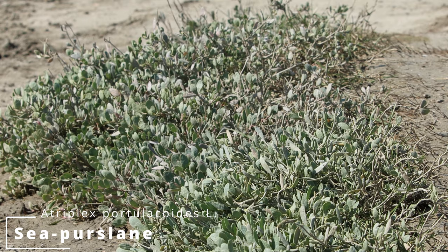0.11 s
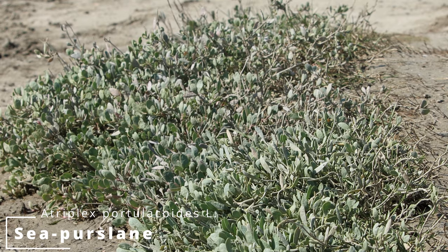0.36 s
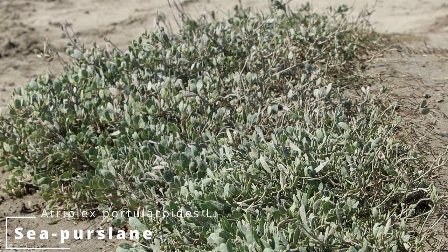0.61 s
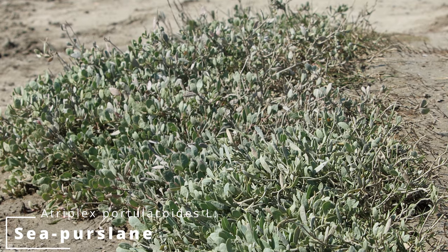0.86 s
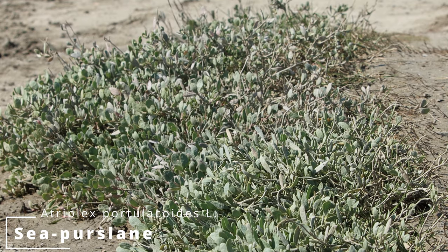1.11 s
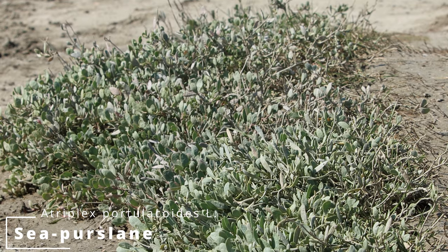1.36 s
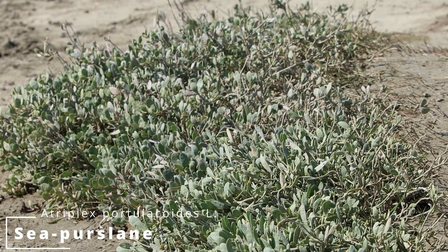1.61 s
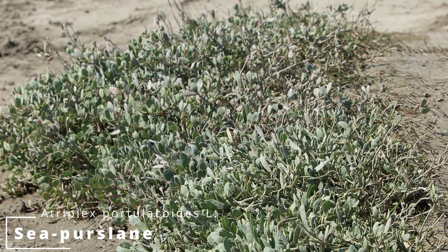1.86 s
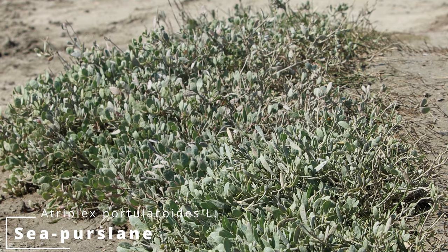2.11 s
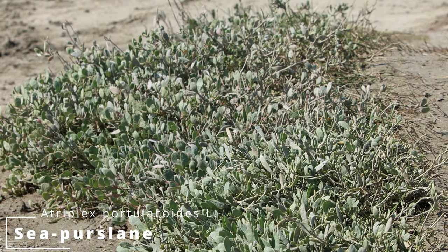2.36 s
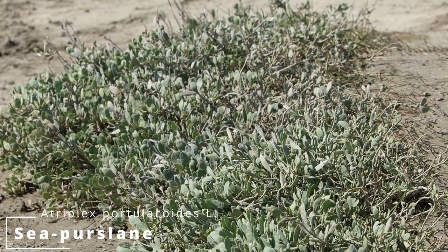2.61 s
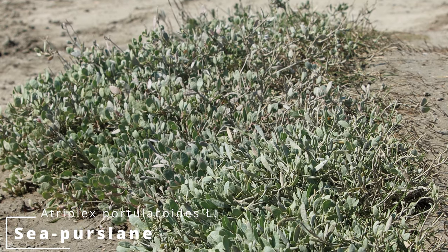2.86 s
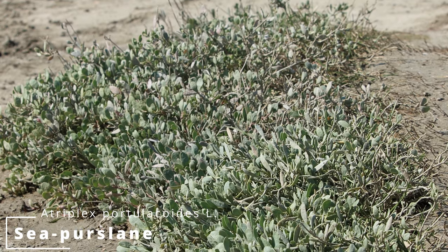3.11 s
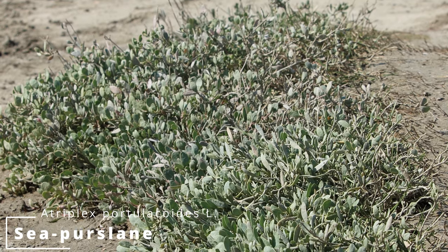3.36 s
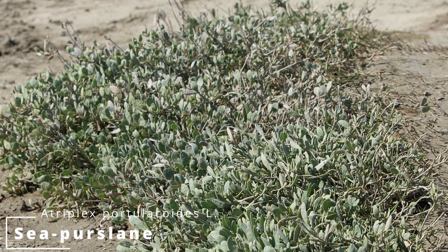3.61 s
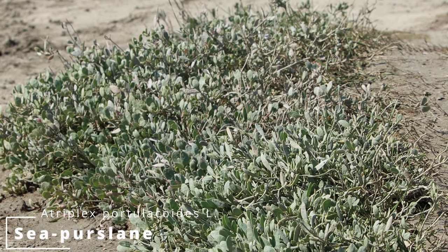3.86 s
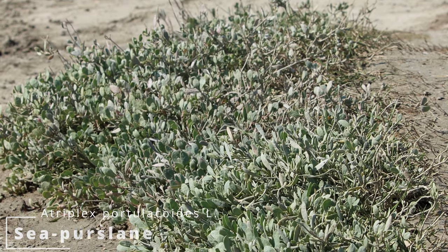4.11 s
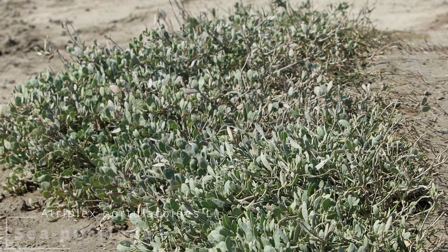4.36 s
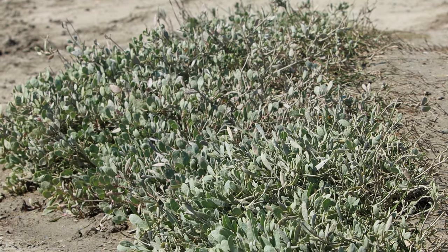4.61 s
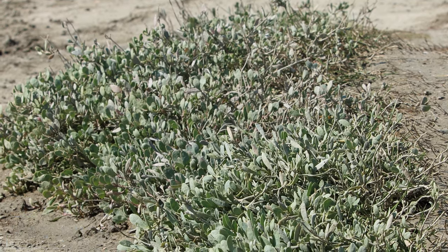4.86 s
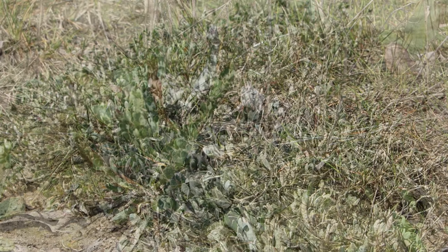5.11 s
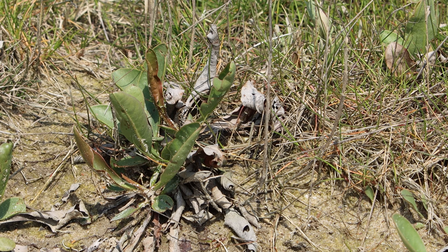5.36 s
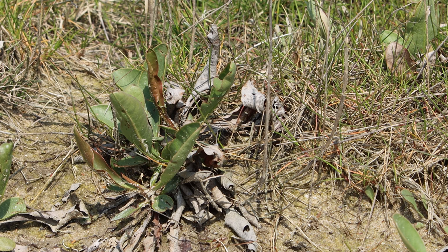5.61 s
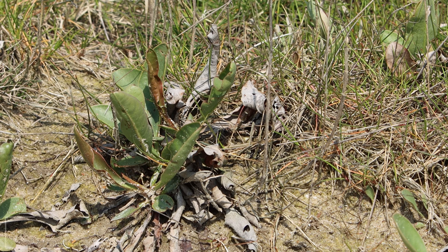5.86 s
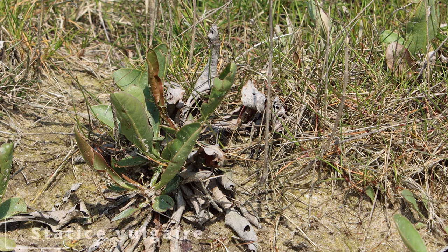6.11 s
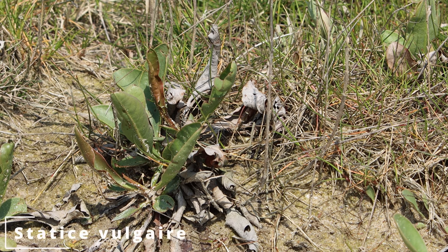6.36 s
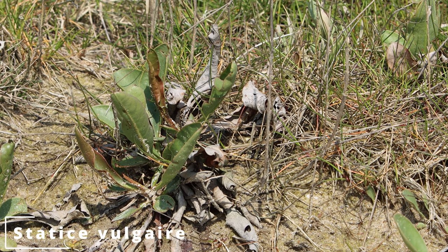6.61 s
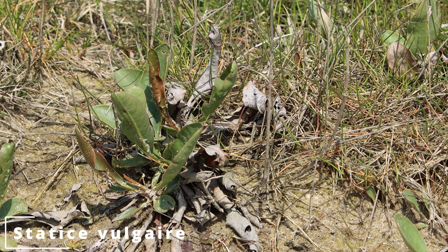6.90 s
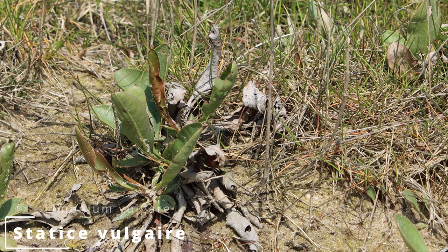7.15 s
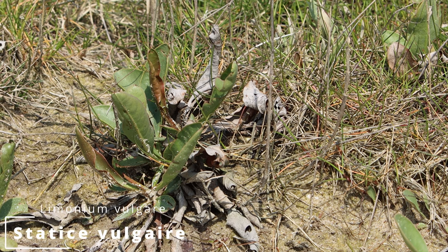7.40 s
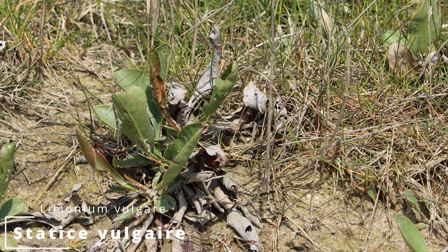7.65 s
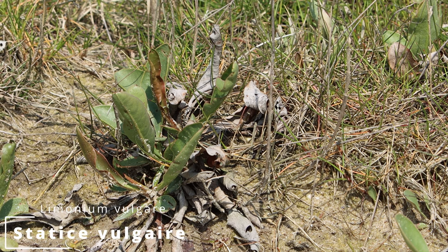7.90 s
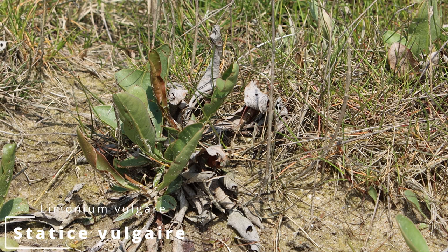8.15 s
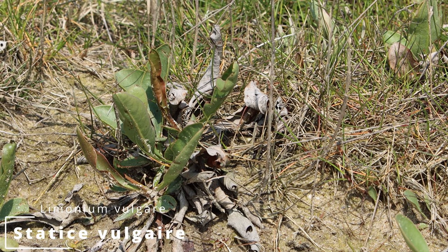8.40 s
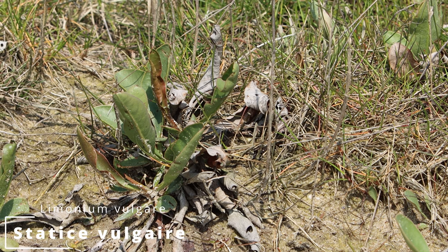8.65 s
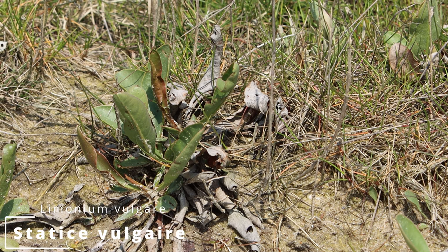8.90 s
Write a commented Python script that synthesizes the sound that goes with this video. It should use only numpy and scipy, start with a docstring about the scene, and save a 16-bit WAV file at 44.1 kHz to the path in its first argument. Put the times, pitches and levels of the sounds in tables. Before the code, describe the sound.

Outdoor stereo ambience with lumpy low wind on the microphone and a smooth faint hiss. A near gull to the right cries seven times, each a nasal, rapidly fluttering call that jumps up then sags, the last much weaker. Distant gulls overlap between cries, thinner and softer. A few sliding wader whistles and tiny high chips appear mainly after five seconds; small dry ticks dot the first half. Slight diffuse echoes, open ground.

```python
"""A windy salt marsh with a gull colony. One gull close on the right repeats a harsh fluttering cry, a sum
of overtones whose pitch and level pulse with the voice membranes and are coloured by throat and bill.
Others answer from farther off with fewer overtones, over a crowd of overlapping cries. Small waders whistle
and chip as gliding near sines; noise bursts make dry ticks and, overlapping, one short broad squawk.
Wind rumbles on the microphone as shaped noise in lumps, over a soft hiss."""
import sys
import numpy as np
from scipy import signal
from scipy.fft import rfft, irfft
from scipy.io import wavfile
from scipy.ndimage import uniform_filter1d

SR = 44100
rng = np.random.default_rng(int(sys.argv[2]) if len(sys.argv) > 2 else 0)


def to_linear_factor(level_db):
    """Convert decibel levels (scalar or array-like) to linear amplitude factors."""
    exponent = np.asarray(level_db, float) / 20
    return 10 ** exponent


def wav_record(signal):
    """Record a signal, one row per channel, as 16-bit PCM in the file named by sys.argv[1]."""
    frames = np.transpose(np.atleast_2d(signal))
    bounded = np.clip(frames, -1, 1)
    # unit amplitude maps onto the largest positive 16-bit level
    quanta = np.round(bounded * 32767).astype(np.int16)
    wavfile.write(sys.argv[1], SR, quanta)


N = 397341

# overtones of a far voice: multiple (of the strongest overtone's pitch), level_db
FAR_OVERTONES = [(.5, -13.5), (1, 3.5), (1.5, -21), (2, -21)]


def in_time(rows, t):
    """Linear interpolation: the columns of a table read at the times t."""
    s, *columns = np.transpose(rows)
    return [np.interp(t, s, column) for column in columns]


def at_hz(points, hz):
    """Spectral envelope: levels interpolated on a log-frequency axis."""
    points_hz, points_db = np.transpose(points)
    return np.interp(np.log(hz), np.log(points_hz), points_db)


def bump(hz, centre_hz, width):
    """Resonance: a bell shape 0-1 on a log-frequency axis."""
    return np.exp(-.5 * (np.log(hz / centre_hz) / width) ** 2)


def drift(rate_hz, size):
    """Random modulation: white noise through a two-pole low-pass, scaled to spread 1."""
    r = np.exp(-2 * np.pi * rate_hz / SR)
    settle = 9000
    slow = signal.lfilter([1], [1, -2 * r, r * r], rng.standard_normal(size + settle))[settle:]
    return slow / slow.std()


def coloured(spectrum, shape):
    """Spectral shaping: white noise bent to a spectrum, rms 1."""
    hz = np.maximum(np.arange(N // 2 + 1) * SR / N, 1)
    noise = irfft(rfft(rng.standard_normal(shape)) * to_linear_factor(at_hz(spectrum, hz)), N)
    return noise / noise.std()


def span(rows):
    """Amplitude window: first sample, times and soft-edged window of a call."""
    first = int(rows[0][0] * SR)
    t = np.arange(first, min(int(rows[-1][0] * SR), N)) / SR
    return first, t, np.clip(np.minimum(t - t[0], t[-1] - t) / 0.0062, 0, 1)


def flutter(per_s, unsteady):
    """Phase accumulation: position 0-1 within each flutter of the voice membranes."""
    rate = per_s * (1 + unsteady * drift(25, size=len(per_s)))
    return (rng.random() + np.cumsum(rate) / SR) % 1


def hiss():
    """Partial coherence: smooth noise of far water and microphone, less alike left and right in the treble."""
    # noise spectrum: frequency_hz, density_db (relative, per Hz)
    hiss_spectrum = [(210, -14.5), (350, 0), (466, -6), (740, -1), (1000, -6), (1800, -6), (2820, -14),
                     (7330, -18.5), (15000, -19.5), (15700, -16)]
    # left-right coherence: frequency_hz, likeness (0-1)
    side_likeness = [(400, 0.8), (1400, 0.92), (2400, 0.78), (4000, 0.66), (5500, 0.12), (9000, 0.096)]
    mid, side = rfft(coloured(hiss_spectrum, (2, N)))
    hz = np.maximum(np.arange(len(mid)) * SR / N, 1)
    alike = np.clip(at_hz(side_likeness, hz), 0, 1)
    pair = np.sqrt(1 + alike) * mid + np.sqrt(1 - alike) * side * [[1], [-1]]
    return to_linear_factor(-68.5) * irfft(pair, N)      # the pair is 3 dB above rms 1 before this gain


def wind():
    """Turbulent pressure on the microphone: lumpy low noise that reaches both channels alike."""
    # rumble: time_s, level_db (before thuds and drift)
    rumble = [(0, -47.5), (1, -46), (2, -48), (2.8, -44.5), (3, -39), (3.28, -43.5), (3.36, -49.5),
              (4.2, -51), (4.8, -48.5), (5.2, -42), (6.3, -43), (6.9, -43.5), (7.27, -53.5), (7.55, -47.5),
              (8.1, -56.5), (8.6, -54), (9.01, -45)]
    # finer buffeting, calming as the microphone moves into shelter: time_s, level_db (before thuds and drift)
    buffeting = [(0, -54.5), (2.3, -53), (3.1, -54), (3.5, -55.5), (4.5, -54.5), (4.9, -51.5), (5.6, -59),
                 (6.3, -57), (6.95, -60), (7.25, -63.5), (8.5, -66), (9.01, -59.5)]
    # rumble spectrum: frequency_hz, density_db (relative, per Hz)
    gust_spectrum = [(8.8, -42.5), (15, 4.5), (39, 5.5), (100, -15.5), (130, -25.5), (220, -120)]
    # buffeting spectrum: frequency_hz, density_db (relative, per Hz)
    buffet_spectrum = [(35, -43), (60, -6), (86, -4.5), (188, -11.5), (464, -31.5), (700, -31), (910, -89),
                       (1540, -120)]
    # single thuds of air: time_s, swell_db (of the rumble)
    air_thuds = [(.17, 6.1), (.93, 3.4), (1.78, 6.1), (2.91, 11), (4.92, 7.2), (5.17, 2), (6.35, 3),
                 (7.58, 5), (8.46, 8.7)]
    thud_spread_s = 0.02
    t = np.arange(N) / SR
    thuds_db = sum(db * np.exp(-.5 * ((t - s) / thud_spread_s) ** 2) for s, db in air_thuds)
    gust_db = in_time(rumble, t)[0] + thuds_db + 1.5 * drift(4.9, size=N)
    buffet_db = in_time(buffeting, t)[0] + 0.19 * thuds_db + 1.87 * drift(6.5, size=N)
    return to_linear_factor(gust_db) * coloured(gust_spectrum, N) + to_linear_factor(buffet_db) * coloured(buffet_spectrum, N)


def ticks_and_squawk():
    """Damped noise: each burst is band-passed around a centre and dies exponentially."""
    # dry ticks nearby, and a short broad squawk at 1.45-1.5 s made of three overlapping noise bursts:
    # start_s, peak_db, centre_hz, t60_s (60 dB decay, before the band-pass)
    burst_rows = [(.048, -60, 4800, 0.0078), (.684, -54, 2400, 0.011), (1.267, -61, 3700, 0.0086),
                  (1.31, -49, 5500, 0.006), (1.41, -63, 4660, .01), (1.443, -60, 8300, .006),
                  (1.453, -55, 3600, 0.059), (1.468, -56, 3600, .055), (1.484, -55, 3480, .05),
                  (1.884, -60, 6200, .006), (2.054, -60, 4400, .01), (2.527, -55, 2400, .02),
                  (3.198, -54, 2970, 0.019), (3.229, -61, 5200, .0068), (4.176, -58.5, 4000, 0.013),
                  (6.833, -62, 3356, .008)]
    out, t = np.zeros(N), np.arange(1500) / SR
    for s, peak_db, hz, t60 in burst_rows:
        burst = rng.standard_normal(len(t)) * to_linear_factor(-60 * t / max(t60, .002))
        # louder bursts are wider: 0.6 octaves at -57.5 dB
        octaves = np.clip(.6 * to_linear_factor(.85 * (peak_db + 57.5)), .1, 2.4)
        half = 2 ** (octaves / 2)
        band = signal.butter(2, [hz / half, hz * half], "band", fs=SR, output="sos")
        burst = signal.sosfilt(band, burst)
        first = int(s * SR)
        out[first:first + len(t)] += to_linear_factor(peak_db) * burst / abs(burst).max()
    return out


def far_cry(hz, overtones, depth, rough, swing):
    """Amplitude and frequency modulation: a gull voice thinned by distance to few throbbing overtones."""
    cycle = flutter(np.full(len(hz), rng.uniform(62.27, 88.6)), unsteady=0.031)
    hz = hz * (1 - swing * np.cos(np.pi * cycle) + rough * drift(261, size=len(hz)))
    phase = 2 * np.pi * np.cumsum(hz) / SR
    tone = sum(to_linear_factor(db) * np.sin(k * phase) for k, db in overtones)
    throb = 1 - depth * np.cos(np.pi * cycle) ** 2
    return 1.42 * tone * throb * to_linear_factor(1.26 * drift(30, size=len(hz)))     # rms near 1


def colony(count=280):
    """Superposition: many short arched cries at chance moments, pitches, lengths and distances."""
    # the crowd of gulls too far to tell apart: time_s, level_db
    crowd_level = [(0, -87), (.35, -68), (1.3, -76), (1.9, -64.5), (2.15, -80), (2.45, -67), (3.3, -62.5),
                   (3.6, -72.5), (4.65, -65), (5.5, -70.5), (5.75, -80.5), (6.45, -68.5), (6.9, -96),
                   (7.5, -73.5), (8.1, -91), (8.45, -88), (8.7, -62.5), (9.01, -84)]
    out = np.zeros(N + SR)
    for when, pitch, length, distance in rng.random((count, 4)):
        along = np.linspace(0, 1, int((0.0584 + .22 * length) * SR))
        hz = (1500 + 700 * pitch) * (.84 + .16 * np.sin(np.pi * along ** .6))
        first = int(when * (N + SR // 2))
        cry = far_cry(hz, FAR_OVERTONES, depth=.9, rough=.06, swing=.035)
        out[first:first + len(along)] += to_linear_factor(-8 * distance) * abs(np.sin(np.pi * along)) * cry
    out = out[SR // 2:SR // 2 + N]
    # even out the crowd before its own level curve
    out = out / np.sqrt(uniform_filter1d(out ** 2, size=15000) + 0.061)
    return to_linear_factor(in_time(crowd_level, np.arange(N) / SR)[0]) * out


def answer(s, rise, length, hz, db):
    """Pitch contour: corners (s, Hz, dB) of a far cry that climbs, sags and breaks off downward."""
    rise_per_s, sag_per_s = 1.8, .65        # shares of the top pitch per s
    drop, drop_s = 0.167, 0.0453            # the break: share of the top pitch, s
    start_db, end_db = -3.5, -5
    held = max(length - rise - drop_s, .001)
    sagged = hz * (1 - sag_per_s * held)
    dropped = sagged - hz * drop * (length - rise - held) / drop_s
    return [(s, hz * (1 - rise_per_s * rise), db + start_db), (s + rise, hz, db),
            (s + rise + held, sagged, db), (s + length, dropped, db + end_db)]


def far_gulls():
    """Modulated overtones: single answering cries, arched ones and hoarse nearly level ones."""
    # arched cries: start_s, rise_s (to the top), length_s, top_pitch_hz (strongest overtone), level_db
    arched_cries = [(.04, .012, 0.24, 1860, -71), (0.159, 0.022, .03, 1370, -65),
                    (0.296, 0.0092, 0.16, 1443, -78), (.33, 0.036, .05, 2110, -68),
                    (.4, 0.048, 0.13, 2100, -66), (0.529, 0.011, .13, 1930, -72),
                    (1.6, 0.082, 0.1, 2200, -63), (1.679, 0.062, .1, 2110, -70.5),
                    (1.929, 0.02, 0.054, 2250, -64.5), (2.485, .025, 0.026, 1397, -65),
                    (2.947, .012, .1, 1856, -69.5), (3.086, 0.021, 0.047, 2170, -64.5),
                    (3.325, 0.021, 0.094, 1956, -68), (3.392, 0.019, 0.037, 1290, -63.5),
                    (4.646, 0.033, 0.066, 2050, -66), (5.24, 0.011, 0.2, 2117, -60.5),
                    (5.409, 0.009, 0.054, 2250, -66), (6.112, 0.068, 0.24, 2186, -64.5),
                    (6.37, 0.016, 0.066, 2150, -71), (6.57, 0.017, 0.067, 2110, -69.5),
                    (7.024, .065, .27, 2100, -61.5), (7.361, .012, 0.075, 1460, -70),
                    (7.419, 0.068, 0.34, 2010, -71), (7.698, 0.082, 0.25, 2118, -61.5),
                    (7.94, .012, .06, 2130, -73), (8.078, .03, .2, 1520, -83),
                    (8.281, 0.045, 0.11, 2220, -73.5), (8.46, .012, 0.09, 2102, -71.5),
                    (8.541, 0.1, 0.15, 1716, -66.5), (8.699, 0.061, 0.12, 2200, -70),
                    (8.881, .04, 0.15, 1803, -71)]
    # bands of hoarse cries, one row a band, some cries have two: start_s, length_s, band_centre_hz, level_db
    hoarse_bands = [(0.238, 0.11, 2030, -64), (1.2, 0.29, 1860, -64), (1.79, 0.11, 1780, -66),
                    (1.888, .14, 1363, -63.5), (3.16, 0.19, 1700, -76), (4.173, 0.27, 1720, -73),
                    (4.251, 0.23, 4040, -77.5), (5.198, 0.13, 4350, -69), (6.754, 0.22, 4320, -79),
                    (7.699, 0.069, 1835, -59), (7.702, 0.056, 3880, -71), (7.879, 0.058, 1902, -60),
                    (7.88, 0.041, 3910, -75), (8.277, .1, 3970, -79), (8.68, 0.126, 1500, -67)]
    hoarse_sag, hoarse_end_db = .04, -2     # share of the pitch lost by the end, dB
    out = np.zeros(N)
    arched = [answer(*row) for row in arched_cries]
    hoarse = [[(s, hz, db), (s + length, hz * (1 - hoarse_sag), db + hoarse_end_db)]
              for s, length, hz, db in hoarse_bands]
    kinds = ((arched, FAR_OVERTONES, .018, .025), (hoarse, [(1, 0)], .045, .035))
    for contours, overtones, rough, swing in kinds:
        for rows in contours:
            first, t, edge = span(rows)
            hz, level_db = in_time(rows, t)
            voice = far_cry(hz, overtones, depth=0.61, rough=rough, swing=swing)
            out[first:first + len(t)] += to_linear_factor(level_db) * edge * voice
    return out


def whistle(s, rise, length, hz, db):
    """Pitch contour: corners (s, Hz, dB) of a whistle that shoots up and bends over ever faster."""
    arch_per_s, start_db, end_db = 1.05, -6, -2
    arch = arch_per_s * length              # longer whistles arch deeper (share of the top pitch)
    after = np.linspace(0, length - rise, 8)
    share = after / after[-1]
    swell_db = end_db * (2 * share - 1) ** 2
    climb = [(s, hz * (1 - arch), db + start_db), (s + rise / 2, hz * (1 - arch / 4), db + end_db)]
    return climb + list(zip(s + rise + after, hz * (1 - arch * share ** 2.4), db + swell_db))


def chip(s, hz, db):
    """Linear glide: corners (s, Hz, dB) of a chip that slides straight down at a steady level."""
    length_s, fall_hz = 0.035, 850
    return [(s, hz, db), (s + length_s, hz - fall_hz, db)]


def shore_birds():
    """Frequency modulation: near sines with a slight waver follow the notes of small waders."""
    # clear arched whistles: start_s, rise_s (to the top), length_s, top_pitch_hz, level_db
    whistle_rows = [(1.635, .02, 0.045, 2520, -61), (5.302, .045, 0.2, 3050, -54.5),
                    (6.061, 0.05, 0.089, 2620, -57.5), (8.597, .045, .06, 2560, -72),
                    (8.783, .012, 0.048, 2530, -65)]
    # falling chips: start_s, first_pitch_hz, level_db
    chip_rows = [(5.38, 5860, -65.5), (5.49, 5500, -74), (6.33, 5780, -64), (7.425, 5600, -74),
                 (8.485, 5500, -65.5)]
    out = np.zeros(N)
    for rows in [whistle(*row) for row in whistle_rows] + [chip(*row) for row in chip_rows]:
        first, t, edge = span(rows)
        hz, level_db = in_time(rows, t)
        hz = uniform_filter1d(hz, size=300) * (1 + 0.0051 * drift(45, size=len(t)))
        out[first:first + len(t)] += to_linear_factor(level_db) * edge * np.sin(2 * np.pi * np.cumsum(hz) / SR)
    return out


def near_gull():
    """Source and filter: each flutter slides the pitch up and opens and shuts the voice; throat and bill
    resonances colour the overtones."""
    # one row a cry: start_s, length_s, level_db, brightness_db_per_octave (before gape), lowest_overtone_db
    near_cries = [(0.779, .4, -49, -4.5, 2), (2.548, .42, -51, -5, -5), (3.634, 0.53, -47.5, -3, -5),
                  (4.735, 0.54, -51.5, -3, -0.5), (5.833, .46, -48.5, -5, -7.5),
                  (7.046, 0.41, -54, -5, -0.5), (8.871, 0.42, -66, 0, -4)]
    # throat response: frequency_hz, level_db
    throat = [(500, -41), (800, -7), (1150, -3.5), (1450, -3.5), (1750, 1.5), (1950, 6.5), (2300, -4.5),
              (2600, -10), (3000, -2.5), (3550, -19), (4300, -6), (6200, -15.5), (7300, -9.5), (8000, -16),
              (10000, -38)]
    # pitch arch: share_of_length, share_of_top_pitch (before fall_power)
    pitch_arch = [(0, .64), (.05, .8), (.14, 1.0), (.4, .975), (.65, 0.75), (.85, .74), (1, 0.48)]
    # lower bill resonance as the bill closes: share_of_length, frequency_hz, level_db (before gape)
    lower_bill = [(0, 4300, 10.5), (.2, 4250, 8.5), (.5, 4450, 11), (.8, 4556, 14), (1, 4400, 10)]
    # upper resonance, following how wide it gapes: time_s, frequency_hz
    upper_gape = [(.77, 6042), (.86, 6370), (.95, 5800), (1.15, 5800), (2.56, 5610), (2.73, 5500),
                  (2.96, 5670), (3.65, 5740), (3.84, 5470), (4.15, 5520), (4.8, 5500), (5.0, 5270),
                  (5.27, 5600), (5.85, 5640), (5.91, 6070), (5.99, 5100), (6.29, 5540), (7.05, 5380)]
    attack_s, attack_db, sag_db, release_s, release_db = 0.036, -7.5, -3.0, .08, -14.5
    swing, depth, breath = .065, .95, .28           # pitch slide, level flutter, random level per overtone
    rough_start, rough_end = .018, .036             # pitch unsteadiness grows through the cry
    fall_power = 1.22                               # steepness of the pitch fall after the top
    gape_brightens, gape_shifts_db = 1.6, 8         # per kHz of gape: dB per octave, dB from lower to upper
    upper_db, half_db, closing_db, tail_db = 6.0, 2.0, -10.0, 8.0
    flutter_end = 66                                # flutters per s
    out = np.zeros(N)
    for s, length, db, bright_db, low_db in near_cries:
        # the level swells in, sags, then dies away
        end = s + length
        rows = [(s, db + attack_db), (s + attack_s, db), (end - release_s, db + sag_db),
                (end, db + sag_db + release_db)]
        first, t, edge = span(rows)
        level_db, = in_time(rows, t)
        along = (t - t[0]) / length
        lower_hz, lower_db = in_time(lower_bill, along)
        upper_hz, = in_time(upper_gape, t)
        gape = (upper_hz - 5600) / 1000             # kHz
        # louder cries reach higher and start fluttering faster; all slow down
        top_hz = max(1176.4 + 11.0 * (db + 50), 1133)
        flutter_start = max(89 + 1.8 * (db + 50), flutter_end + 6)
        cycle = flutter(flutter_start + (flutter_end - flutter_start) * along, unsteady=.035)
        rough = rough_start + (rough_end - rough_start) * np.sqrt(along)
        grown = np.clip((t - t[0]) / 0.0414, 0, 1) ** 2     # the cry opens on a clear note
        hz = top_hz * in_time(pitch_arch, along)[0] ** np.where(along > .14, fall_power, 1)
        slide = swing * grown * (.5 + along) * np.cos(np.pi * cycle)
        hz = hz * (1 - slide + rough * drift(310.0, size=len(t)))
        phase = 2 * np.pi * np.cumsum(hz) / SR
        lowest_db = low_db * grown + tail_db * along ** 6   # the lowest whole overtone outlasts the rest
        slope_db = bright_db + gape_brightens * gape
        tone = 0
        for k in np.arange(1, 23) / 2:              # strong-weak pulses add lines halfway between
            line_hz = k * hz
            bill_db = (lower_db - gape_shifts_db * gape) * bump(line_hz, lower_hz, .06)
            bill_db = bill_db + (upper_db + gape_shifts_db * gape) * bump(line_hz, upper_hz, .065)
            # this band fades as the bill closes
            bill_db = bill_db + closing_db * along * bump(line_hz, 3150, 0.084)
            gain = to_linear_factor(at_hz(throat, line_hz) + slope_db * np.log2(line_hz / 2000) + bill_db)
            if k % 1:
                gain = gain * grown * to_linear_factor(half_db)
            elif k == 1:
                gain = gain * to_linear_factor(lowest_db)
            tone = tone + gain * np.sin(k * phase) * (1 + breath * drift(330, size=len(t)))
        tone = tone * (1 - depth * grown * np.cos(np.pi * cycle) ** 2)
        loudness = np.sqrt(uniform_filter1d(tone ** 2, size=1200))
        out[first:first + len(t)] += to_linear_factor(level_db) * edge * tone / loudness
    return out


def from_the_right(x):
    """Interaural cues: the left side hears it later and duller; the pair is then narrowed."""
    lag_s, shadow_db, shadow_hz, pair_width = 0.000325, -5, 4000, .32     # lag and shadow before narrowing
    late = np.interp(np.arange(N) - lag_s * SR, np.arange(N), x)
    treble = signal.sosfilt(signal.butter(1, shadow_hz, "high", fs=SR, output="sos"), late)
    late = late - (1 - to_linear_factor(shadow_db)) * treble
    return (late + x) / 2 + pair_width * (late - x) / 2 * np.array([[1], [-1]])


def open_ground(x, wet_db):
    """Diffuse reflection: convolution with scattered echoes off mud banks, other ones on each side."""
    t = np.arange(SR // 4) / SR
    tail = rng.standard_normal((2, len(t))) * to_linear_factor(-60 * t / 0.18) * (t > .004)
    tail = tail / np.sqrt((tail ** 2).sum(axis=1, keepdims=True))
    return to_linear_factor(wet_db) * signal.fftconvolve(x[None], tail, axes=1)[:, :N]


def scene():
    """Superposition: all birds with their echoes, noise bursts, wind and hiss in two channels."""
    near = near_gull()
    ahead = far_gulls() + colony() + shore_birds()
    echoes = open_ground(near, wet_db=-11) + open_ground(ahead, wet_db=-17.5)
    birds = from_the_right(near) + ahead + echoes
    return birds + ticks_and_squawk() + wind() + hiss()


def roll_off(x):
    """The treble ends steeply here."""
    return signal.sosfilt(signal.butter(12, 15880, fs=SR, output="sos"), x)


def record(dry):
    """Transmission: the finished two-channel mix passes on to the output."""
    return roll_off(dry)


dry = scene()
out = record(dry)
wav_record(out)
```